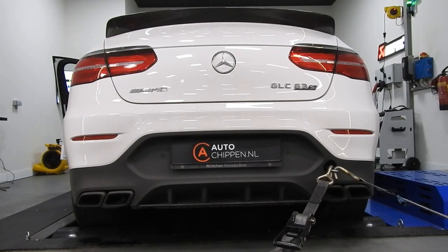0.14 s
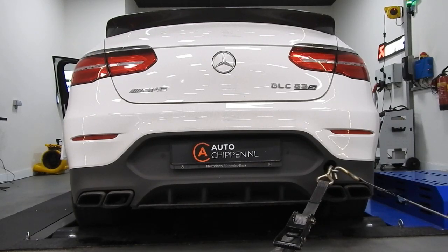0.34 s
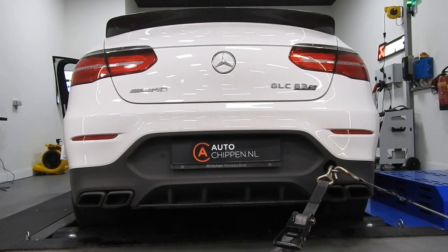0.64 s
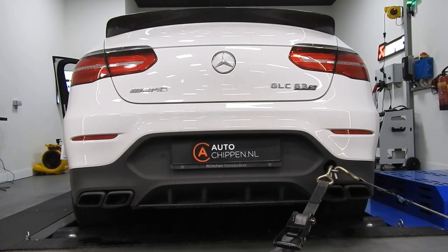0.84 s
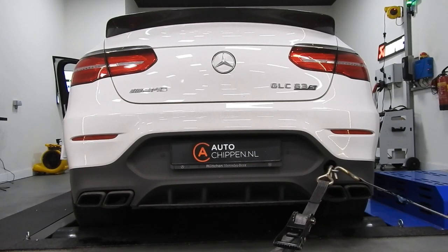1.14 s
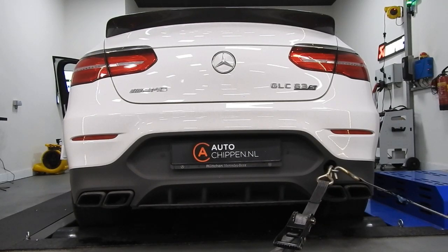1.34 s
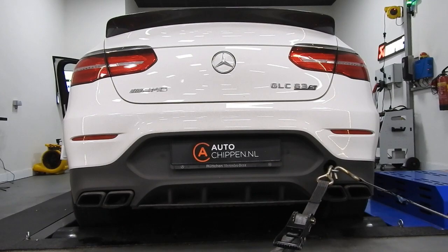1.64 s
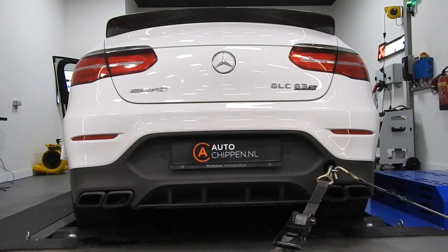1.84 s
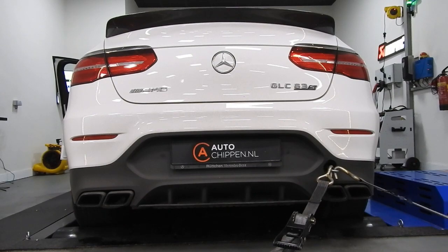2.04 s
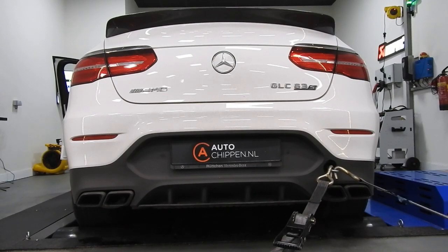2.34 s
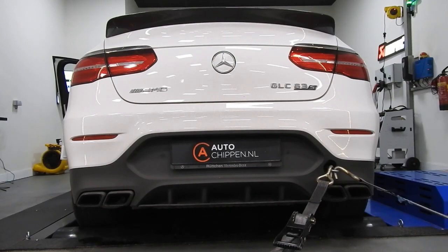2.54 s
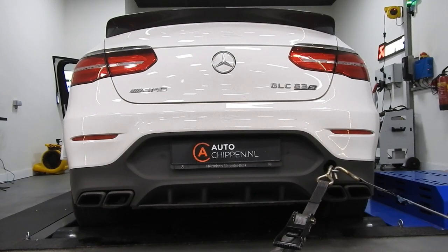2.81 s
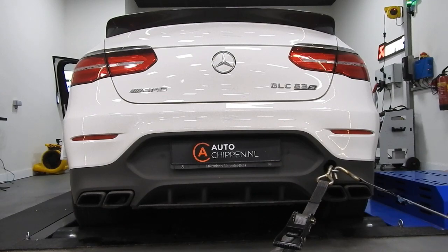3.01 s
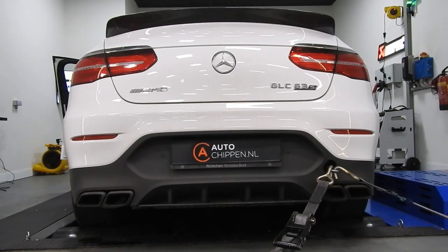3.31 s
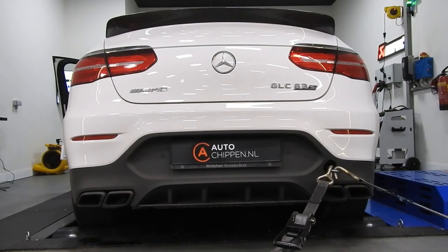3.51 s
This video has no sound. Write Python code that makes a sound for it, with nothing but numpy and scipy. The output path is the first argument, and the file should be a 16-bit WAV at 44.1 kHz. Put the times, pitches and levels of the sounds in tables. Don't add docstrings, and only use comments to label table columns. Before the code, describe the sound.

A powerful car engine burbles quietly, takes a short dab at 0.25 s, then roars upward from 0.37 to 0.7 s with raspy exhaust and gas hiss. Pops and booms scatter until 1.1 s as it sinks to a low grumble. A second rev at 1.8-2.05 s releases bright cracks until 2.4 s; it settles, then a third at 3.14-3.4 s ends crackling. Hard workshop reflections, close, nearly overloaded stereo microphone.

```python
import sys
import numpy as np
from scipy import signal
from scipy.fft import rfft, irfft, next_fast_len
from scipy.io import wavfile
from scipy.ndimage import uniform_filter1d

SR = 44100
rng = np.random.default_rng(int(sys.argv[2]) if len(sys.argv) > 2 else 0)


def ratio_of_db(decibels):
    return 10 ** (np.asarray(decibels, float) / 20)


def store_wav(level_fs):
    pcm = np.round(np.clip(np.atleast_2d(level_fs), -1, 1) * 32767)
    wavfile.write(sys.argv[1], SR, pcm.T.astype(np.int16))


N = 161406


def in_time(rows):
    seconds, *columns = np.transpose(rows)
    return [np.interp(np.arange(N) / SR, seconds, c) for c in columns]


def strikes(rows):
    seconds, *levels_db = np.transpose(rows)
    tracks = np.zeros((len(levels_db), N))
    tracks[:, (seconds * SR).astype(int)] = ratio_of_db(np.array(levels_db))
    return tracks


def rms_one(x):
    return x / np.sqrt(np.mean(x ** 2) + 1e-20)


def at_hz(points, hz):
    table_hz, value = np.transpose(points)
    return np.interp(np.log(hz), np.log(table_hz), value)


def butter(x, order, hz, kind="low"):
    return signal.sosfilt(signal.butter(order, hz, kind, fs=SR, output="sos"), x)


def drift(rate_hz):
    r = np.exp(-80 * np.pi * rate_hz / SR)
    slow = signal.lfilter([1], [1, -2 * r, r * r], rng.standard_normal(N // 40 + 2002))[2000:]
    return np.interp(np.arange(N) / 40, np.arange(len(slow)), rms_one(slow))


def dying(clicks, t60):
    return signal.lfilter([1], [1, -ratio_of_db(-60 / (t60 * SR))], clicks + 1e-18)


# frequency in Hz, likeness from 0 to 1.
LIKENESS = [(60, 0.83), (240, 0.8), (950, 0.78), (3770, 0.56), (15000, 0.025)]


def coloured(spectrum):
    hz = np.maximum(np.fft.rfftfreq(N, 1 / SR), 1)
    alike = np.clip(at_hz(LIKENESS, hz), 0, 1)
    mid, side = rfft(rng.standard_normal((2, N))) * ratio_of_db(at_hz(spectrum, hz))
    return rms_one(irfft(np.sqrt(1 + alike) * mid + np.sqrt(1 - alike) * side * [[1], [-1]], N))


# time in seconds, speed in turns per second.
CRANK = [(0, 23.1), (.22, 20.7), (.3, 26.03), (.39, 27.08), (.47, 42.62), (.535, 55.13), (.61, 63.56),
         (.685, 72.46), (1.0, 45.52), (1.2, 40), (1.49, 34), (1.81, 29.87), (1.926, 49.77), (2.03, 62.06),
         (2.45, 43.23), (2.6, 38.33), (2.77, 34.92), (3.125, 30.52), (3.256, 51.75), (3.31, 59), (3.38, 68),
         (3.66, 53.2)]


def crank_speed():
    return in_time(CRANK)[0]


ORDER = np.array([1, 1.5, 2, 2.5, 3, 3.5, 4, 4.5, 5, 6, 7, 8, 9])
LOAD_DB = [-26, -20, -9, -19, 1, -18, -3, -17, -6, -13, -12, -17, -20]
COAST_DB = [-52, -44, -30, -41, -29, -40, -22, -42, -32, -38, -42, -42, -40]
# frequency in Hz, level in dB.
ORDER_COLOUR = [(60, -4), (90, 4.5), (130, 0.5), (190, 2.5), (240, -3), (295, 4.5), (355, 7), (430, 5)]


def orders(crank_hz, burble_db):
    load, turns = throttle(), np.cumsum(crank_hz) / SR
    coast = ratio_of_db(-0.8 * np.maximum(burble_db + 23.5, 0))
    out = 0
    for k, load_db, coast_db in zip(ORDER, LOAD_DB, COAST_DB):
        level = load * ratio_of_db(load_db + at_hz(ORDER_COLOUR, k * crank_hz)) + coast * ratio_of_db(coast_db)
        wobble_db = 1.2 + 0.9 * np.clip(k - 4.2, 0, 3)
        wobble = ratio_of_db(wobble_db * drift(6 * np.sqrt(k)))
        phase = rng.uniform(0, 2 * np.pi)
        out = out + np.sqrt(2) * level * wobble * np.sin(2 * np.pi * k * turns + phase)
    return out


CYLINDER_DB = [-1, -2, -3, -8, -2, -0.5, -6, -2]


def firings(turns):
    count = np.arange(1, 800)
    timing, strength, sign = rng.standard_normal((3, len(count)))
    at = np.interp((count + 0.17 * timing) / 4, turns, np.arange(N)).astype(int)
    level = ratio_of_db(np.array(CYLINDER_DB)[count % 8] + 2.2 * strength)
    clicks = np.zeros(N)
    np.add.at(clicks, at, (at < N - 1) * np.sign(sign) * level)
    return clicks / np.sqrt(uniform_filter1d(clicks ** 2, size=8820) + 1e-9)


def gas_gate(clicks):
    puffs = uniform_filter1d(dying(abs(clicks), 0.013), size=60)
    return 0.76 + 0.24 * rms_one(puffs)


# frequency in Hz, width in Hz, level in dB.
PIPE = [(85, 22.2, 1), (159.5, 45, -1.5), (215.3, 33.7, -3.5), (284.7, 32.3, -4.5), (360.2, 17.7, 4),
        (426.3, 37, -4), (573.3, 51, -7.5), (657.5, 35.7, -4.5), (780, 131, -12), (1170, 270, -14),
        (1390, 180, -12), (1610, 239, -12.5), (2018, 654, -22), (2980, 770, -25)]


def pipes(x, rasp, body=1, deep=1):
    out = 0
    for k, (hz, width, db) in enumerate(PIPE):
        r = np.exp(-np.pi * width / SR)
        top = [(1 - r * r) / 2, 0, (r * r - 1) / 2]
        bottom = [1, -2 * r * np.cos(2 * np.pi * hz / SR), r * r]
        rung, share = signal.lfilter(top, bottom, x + 1e-18), 1
        if hz > 900:
            rung, share = signal.lfilter(top, bottom, rung), rasp
        elif hz > 500:
            share = body
        elif hz < 250:
            share = deep
        out = out + (-1) ** k * ratio_of_db(db) * rung * share
    return out


# time in seconds, firing burble in dB, rasp against burble in dB, gas flow in dB.
EFFORT = [(0, -26, 0.5, -46), (.22, -25, -3.5, -42.5), (.3, -23.5, 6.5, -39.5), (.44, -18, 6, -31.5),
          (.62, -10.5, 3.5, -25.5), (.7, -12, -6.5, -31.5), (1.06, -16, -1.5, -31.5),
          (1.13, -20, -1.5, -31), (1.44, -26.5, 0.5, -42.5), (1.8, -25.5, -3, -46), (1.85, -18, 7, -36.5),
          (2.03, -10.5, 0.5, -24), (2.42, -13.5, -2, -29), (2.56, -21, 0.5, -36.5),
          (3.125, -27.5, -0.5, -47.5), (3.15, -18.5, 5.5, -37), (3.39, -9, 3.5, -23),
          (3.66, -16.5, -7, -26.5)]


def exhaust_effort():
    return in_time(EFFORT)


def burble(clicks, gate, burble_db, rasp_db):
    steady = ratio_of_db(-5 * np.minimum(throttle() / ratio_of_db(-17), 1))
    steady = steady * ratio_of_db(-2.5 * np.clip((-20 - burble_db) / 3, 0, 1))
    gas = butter(rng.standard_normal(N), 2, [950, 3500], "band")
    drive = butter(clicks, 2, 680) + gate * gas
    body = ratio_of_db(0.3 * (burble_db + 19.5))
    piped = pipes(drive, ratio_of_db(rasp_db), body, steady) / np.std(pipes(drive, 0.68))
    return ratio_of_db(burble_db) * piped * gate ** 0.42


# frequency in Hz, level in dB per Hz.
HISS = [(1060, 0.5), (1800, -2), (2290, -2), (2630, -9.5), (3290, -3.5), (9420, -16.5), (10700, -23.5),
        (13000, -55)]


def air(turns, flow_db, gate):
    hiss = coloured(HISS)
    hiss = hiss + butter(hiss, 1, 5900, "high") * (ratio_of_db(0.32 * (flow_db + 52)) - 1)
    hiss = ratio_of_db(flow_db + 5) * hiss
    sizzle = butter(rng.standard_normal((2, N)), 2, 12000, "high")
    sizzle = ratio_of_db(-43 + 2.3 * (flow_db + 27.5)) * sizzle
    slow = rms_one(butter(rng.standard_normal((2, N)), 2, 700))
    whoosh = ratio_of_db(-52 + 0.6 * (flow_db + 48)) * slow * np.sin(2 * np.pi * 245 * turns)
    whoosh = butter(whoosh, 8, 9800)
    roar = rms_one(butter(rng.standard_normal(N), 3, [1580, 3700], "band"))
    throat_hz = 2070
    note = rms_one(butter(rng.standard_normal(N), 3, [0.985 * throat_hz, 1.08 * throat_hz], "band"))
    intake = throttle() * (ratio_of_db(-14 + 0.82 * (flow_db + 34.5)) * roar + ratio_of_db(-21) * note)
    return gate * (hiss + sizzle + intake) + whoosh


# time in seconds, peak in dB, pitch in Hz.
PINGS = [(0.07, -13, 1390), (0.0923, -21, 1170), (0.132, -18, 1320), (0.1955, -15.5, 1390),
         (0.287, -28, 1350), (0.377, -16, 1380), (0.395, -10, 1580), (0.4578, -13, 1610),
         (0.4875, -7, 1110), (0.5152, -6, 1630), (0.5576, -6, 1690), (0.6, 0, 1250), (0.6726, -5, 1240),
         (0.7238, -8.5, 1630), (0.7965, -29, 1341), (0.874, -16, 1507), (0.934, -10, 1490),
         (0.9547, -8, 1559), (1.0086, -16, 1620), (1.036, -10, 1470), (1.0597, -13, 1110),
         (1.4424, -19, 1320), (1.58, -17, 1390), (1.6075, -28, 1580), (1.676, -21, 1330),
         (1.7501, -24, 1407), (1.7976, -23, 1120), (1.8175, -16, 1300), (1.8531, -2, 1574),
         (1.9009, -3, 1536), (1.9628, -5, 1126), (2.0545, -1, 1407), (2.1241, -12, 1310),
         (2.2059, -9, 1608), (2.2238, -9, 1459), (2.3414, -6, 1211), (2.3711, -4.5, 1460),
         (2.7741, -22, 1346), (2.9136, -23, 1309), (2.9362, -27, 1444), (3.026, -20, 1430),
         (3.091, -17.5, 1350), (3.137, -9.5, 1440), (3.1934, -9, 1509), (3.238, -2, 1417),
         (3.2988, -1, 1345), (3.3376, -5, 1373), (3.3718, -7, 1320), (3.5682, -12.5, 1460),
         (3.6377, -8, 1590)]


def pings():
    out, t = np.zeros(N + 900), np.arange(900) / SR
    rise = t / 0.0024
    shape = (rise * np.exp(1 - rise)) ** 2
    for s, db, hz in PINGS:
        start = int(s * SR)
        out[start:start + len(t)] += ratio_of_db(db - 3.5) * shape * np.sin(2 * np.pi * hz * t)
    return out[:N]


# time in seconds, rap peak in dB, boom in dB.
BANGS = [(0.0717, -29, -26), (0.1947, -25, -35), (0.2875, -15.5, -13), (0.3959, -23, -11),
         (0.4616, -14, -31), (0.6, -3, -24), (0.6594, -31, -5.5), (0.7445, -10, -12), (0.7973, -9, -41),
         (0.8738, -17, -19), (0.9348, -14, -24), (0.9477, -7.5, -33), (1.0372, -13, -15), (1.05, -9, -20.5),
         (1.8522, -12, -27), (1.9007, -16, -16), (1.9868, -2, -37), (2.0984, -9, -35), (2.2244, -9, -32),
         (2.249, -11, -22), (2.3786, -4, -13.5), (2.4892, -41, -18), (3.1367, -16, -12), (3.1949, -7, -38),
         (3.4222, -11, -15.5), (3.5296, -15, -15), (3.5686, -6, -13.5), (3.6385, -21, -11.5)]


def thumps():
    rap, boom = strikes(BANGS)
    puffs = butter(ratio_of_db(20) * rap + dying(rap, 0.046) * rng.standard_normal(N), 2, 3000)
    boom_hz, boom_t60_s = 90, 0.13
    r, w = ratio_of_db(-60 / (boom_t60_s * SR)), 2 * np.pi * boom_hz / SR
    booms = signal.lfilter([0, np.sin(w)], [1, -2 * r * np.cos(w), r * r], boom + 1e-18)
    return ratio_of_db(15) * pipes(puffs, 2.92) + ratio_of_db(8) * butter(booms, 2, 2 * boom_hz)


# time in seconds, peak in dB.
CRACKS = [(0.197, -36), (0.2984, -28), (0.3904, -28), (0.4627, -26), (0.5188, -18), (0.6135, -10.5),
          (0.6823, -12.5), (0.7003, -12), (0.7444, -21), (0.8634, -14), (0.944, -10.5), (0.9658, -9),
          (1.0391, -19), (1.07, -11.5), (1.8945, -23), (1.988, -12), (2.0251, -3), (2.0519, -3.5),
          (2.0865, -6), (2.159, -6.5), (2.2457, -6), (2.3808, -8), (2.4092, -39), (3.2816, -17.5),
          (3.3526, -27), (3.3886, -1), (3.4094, -6), (3.4243, -10), (3.4742, -7), (3.5024, -5.5)]
# frequency in Hz, level in dB per Hz.
CRACK = [(1180, -32), (2000, 6), (2320, 5), (3680, -4), (4860, 2.5), (9010, 0), (16000, -24)]


def cracks():
    crack, = strikes(CRACKS)
    return ratio_of_db(-9) * (dying(crack, 0.12) + dying(crack, 0.006)) * coloured(CRACK)


def tick():
    click, = strikes([(0.197, -10)])
    return butter(click, 2, 1200, "high")


# opening time in seconds, shutting time in seconds, level in dB.
BLIPS = [
    (0.252, 0.334, -18),
    (0.372, 0.69, -15.5),
    (1.814, 2.04, -16.5),
    (3.138, 3.378, -15.5),
]


def throttle():
    t = np.arange(N) / SR
    open_s, shut_s = 0.01, 0.0073
    out = 0
    for opens, shuts, db in BLIPS:
        ramp = np.minimum((t - opens) / open_s, (shuts - t) / shut_s + 1)
        out = out + ratio_of_db(db) * np.clip(ramp, 0, 1)
    return out


def shop(x):
    t60_s, wall_cut_hz = 0.75, 1500
    size = next_fast_len(N + SR)
    hz, spectrum, out = np.fft.rfftfreq(size, 1 / SR), rfft(x, size), []
    for lags, low_hz in zip(rng.uniform(0.02, 0.055, (2, 8)), (500, 1500)):
        wet = 0
        for k, lag in enumerate(lags):
            delay = np.exp(-2j * np.pi * hz * lag)
            loss = ratio_of_db(-60 * lag / t60_s) / (1 + 1j * hz / wall_cut_hz * lag * 20)
            wet = wet + (-1) ** k * delay / (1 - loss * delay)
        less_bass = 1j * hz / (low_hz + 1j * hz)
        out.append(irfft(wet * spectrum * less_bass, size)[:N] / np.sqrt(8))
    mid, side = out
    return ratio_of_db(-12) * np.array([mid + side, mid - side])


def scene():
    crank_hz = crank_speed()
    turns = np.cumsum(crank_hz) / SR
    burble_db, rasp_db, flow_db = exhaust_effort()
    clicks = firings(turns)
    gate = gas_gate(clicks)
    low = orders(crank_hz, burble_db) + burble(clicks, gate, burble_db, rasp_db)
    low = low + pings() + thumps() + tick()
    bass_lean = ratio_of_db([[1.6], [-1.6]]) - 1
    dry = low + butter(low, 1, 450) * bass_lean + cracks() + air(turns, flow_db, gate)
    return dry + shop(dry.mean(axis=0))


def top_cut(x):
    return signal.sosfilt(signal.butter(12, 15900, fs=SR, output="sos"), x)


def record(dry):
    x = butter(dry, 2, 60.5, "high")
    x = x - 0.1 * butter(x, 1, [6000, 11000], "band") * [[1], [-1]]
    ceiling, knee = 0.95, 3
    x = x / (1 + abs(x / ceiling) ** knee) ** (1 / knee)
    x = signal.sosfilt(signal.cheby2(10, 60, 17600, fs=SR, output="sos"), x)
    return top_cut(x)


dry = scene()
out = record(dry)
store_wav(out)
```